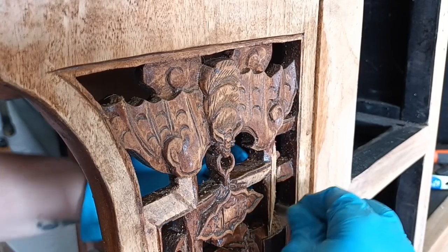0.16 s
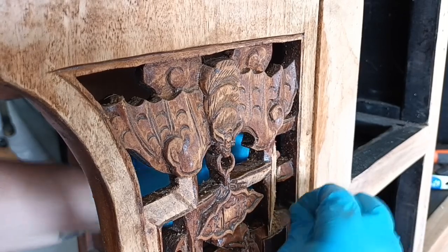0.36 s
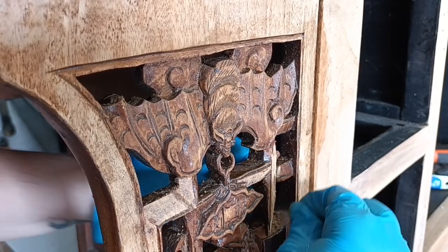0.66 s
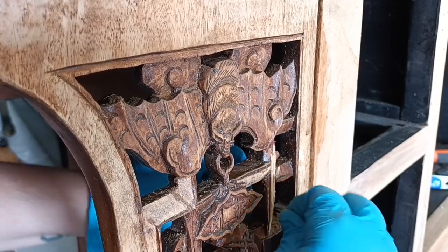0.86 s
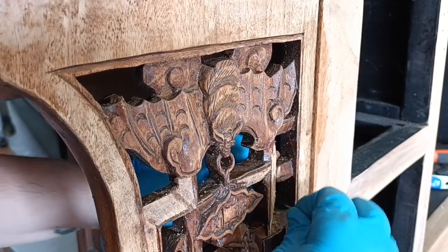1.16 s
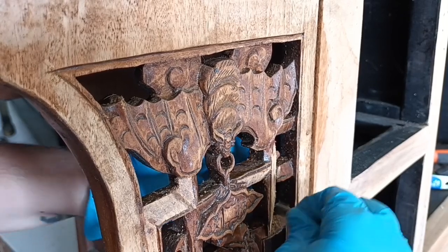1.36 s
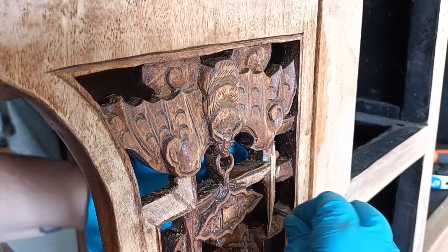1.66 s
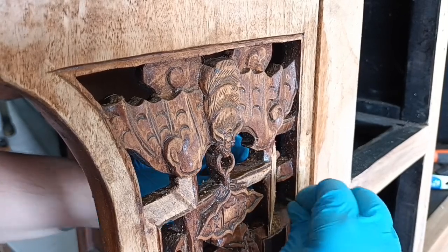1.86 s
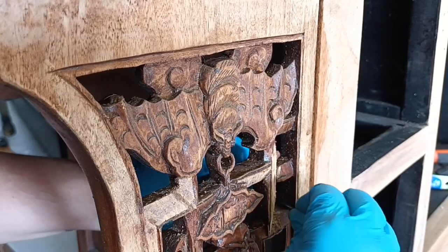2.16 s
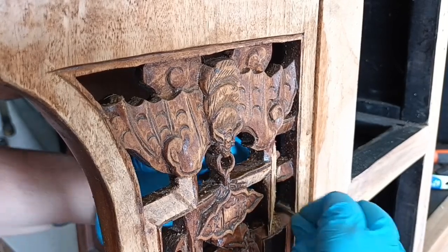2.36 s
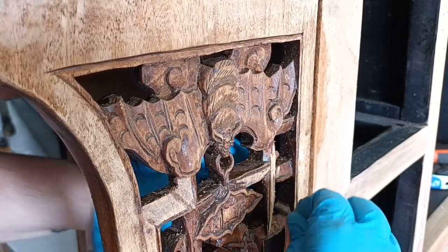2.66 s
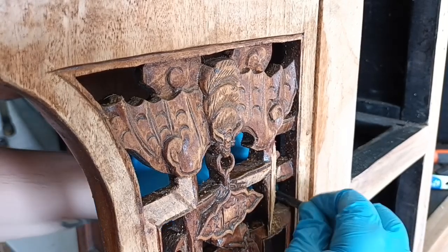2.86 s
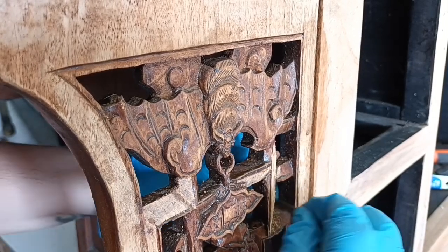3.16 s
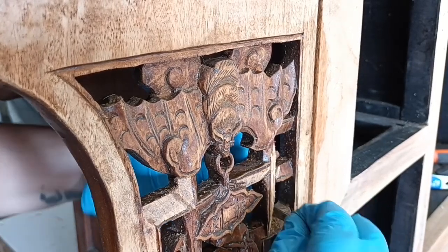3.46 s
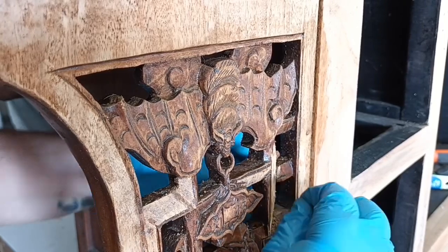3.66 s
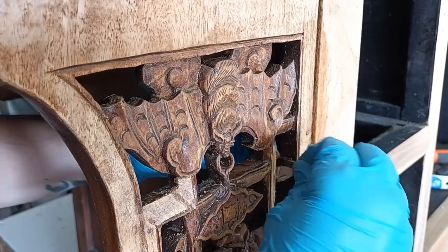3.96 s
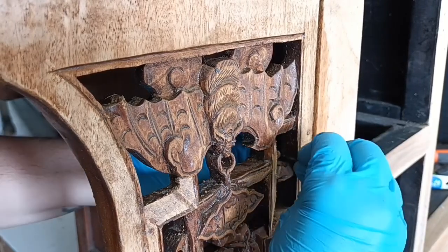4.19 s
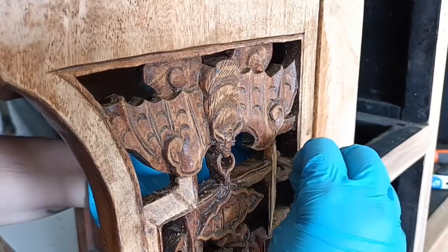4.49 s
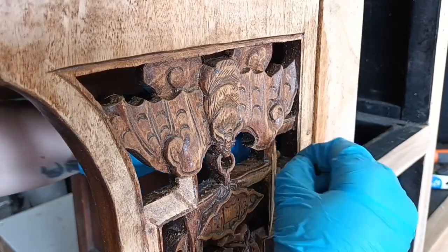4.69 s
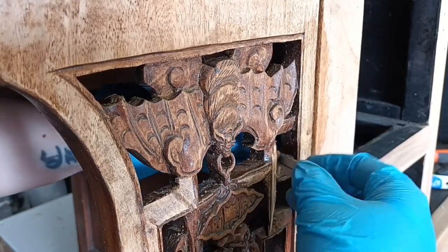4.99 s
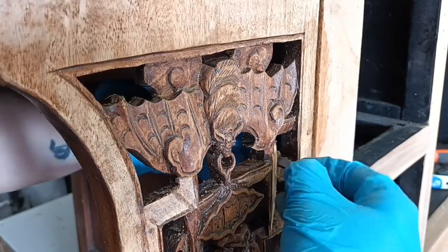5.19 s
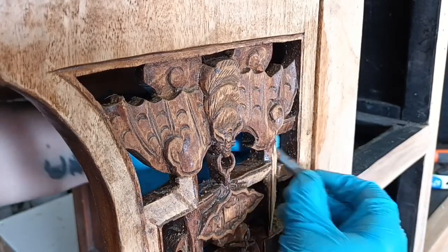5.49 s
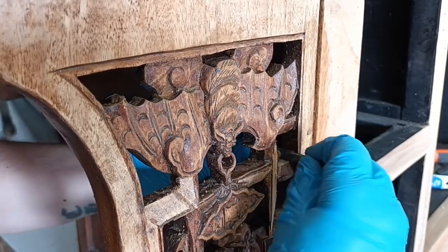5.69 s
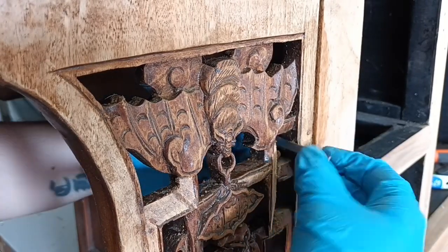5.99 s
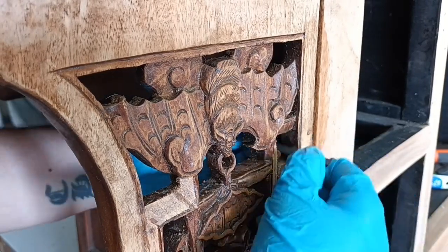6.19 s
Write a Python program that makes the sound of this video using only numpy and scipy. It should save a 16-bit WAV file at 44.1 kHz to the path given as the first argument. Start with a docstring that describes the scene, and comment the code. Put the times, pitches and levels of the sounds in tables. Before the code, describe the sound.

A scraper works old finish from a carved wooden frame, heard close and slightly to the right. First come separate gritty strokes with a hollow resonant body, sharp ticks and a few clacks with short reverberation. Then rapid stubby jabs and muffled bumps follow, almost without echo, with tiny thin chirps. A quieter fiddling passage leads to a last tap and scrapes over low rumble and faint room noise.

```python
"""A hand scraper takes old finish off carved hardwood: at first long draws, with a few jabs and nudges among them.
Their edge noise leads the wood; random fractures ring wood and blade resonances, with snaps and light taps on top.
Early on, filtered noise clacks as knocks, thin gliding tones chirp and a decaying noise tail gives reverberation.
After three seconds the reverberant tail is cut short, then returns faintly; short jabs and dull nudges take over.
Chirps go on now and then, over noise for the frame's rumble and a steady workshop background."""
import sys
import numpy as np
from scipy import signal
from scipy.fft import rfft, irfft
from scipy.io import wavfile
from scipy.ndimage import uniform_filter1d, map_coordinates

SR = 44100
rng = np.random.default_rng(int(sys.argv[2]) if len(sys.argv) > 2 else 0)


def transcribe(u):
    """Save the signal u as a 16-bit wav file named by the first command-line argument.

    u: samples, shape (n,) or (channels, n), limited to [-1, 1]; the rate is SR.
    q: integer samples, one column per channel.
    """
    v = np.clip(np.atleast_2d(u).T, -1, 1)
    q = np.round(v * 32767).astype(np.int16)
    wavfile.write(sys.argv[1], SR, q)


N = 279594
TIME = np.arange(N) / SR  # s
FREQ = np.fft.rfftfreq(N, 1 / SR)  # Hz

# Long draws of the blade: [peak t/s, rise/s, fall/s, force/dB, rasp over force/dB, hiss over force/dB]
DRAWS = [(0.01, 0.036, 0.054, -45, 3, 3.5), (0.268, 0.025, 0.019, -41, 1, -23),
         (0.392, 0.059, 0.071, -36, -5.5, -1), (0.748, 0.023, 0.028, -47.5, 3, 10),
         (0.822, 0.032, 0.057, -30.5, -9.5, -15), (1.158, 0.03, 0.027, -52, 4, 11.5),
         (1.225, 0.078, 0.14, -43.5, -7.5, -12), (1.549, 0.026, 0.037, -53.5, -16, 7.5),
         (1.585, 0.047, 0.065, -41, -9.5, -39), (2.19, 0.042, 0.042, -33.5, -12, -14.5),
         (2.6, 0.069, 0.064, -35.5, -9, -10.5), (2.966, .024, 0.065, -28.5, -1, -9.5)]
DRAW_FRAME_DB = -10.5  # over the force
# Lags of a draw, the edge ahead of the wood: [frame/s, panel/s, rasp/s, hiss/s]
DRAW_LAGS_S = (-0.0058, 0.0061, -0.0076, -0.015)
# Short jabs into the carving: [peak t/s, rise/s, fall/s, force/dB, hiss over force/dB]
JABS = [(0.235, 0.014, .012, -56, 14.5), (1.647, 0.0045, .006, -57, 3.5), (1.9, .014, 0.0074, -61.5, -5),
        (1.99, 0.027, 0.015, -52.5, -19), (2.481, 0.0037, 0.0089, -56, 1.5),
        (2.833, 0.0038, 0.01, -61, 7.5), (3.1, 0.031, .024, -53, -2.5), (3.175, 0.016, .023, -35, -8),
        (3.26, 0.0099, 0.014, -37.5, -7.5), (3.333, 0.0082, .021, -29.5, -11.5),
        (3.424, 0.0085, 0.018, -27.5, -17.5), (3.518, 0.015, .014, -43, -13),
        (3.573, 0.011, 0.025, -34.5, -19.5), (3.661, 0.019, 0.024, -33.5, -8),
        (3.893, 0.0032, 0.0052, -32.5, -18), (3.924, 0.026, 0.013, -36.5, -4.5),
        (4.042, .02, 0.024, -55.5, -8), (4.107, .021, 0.021, -53, -4.5), (4.165, 0.0076, 0.017, -50.5, -7),
        (4.236, 0.0036, .018, -30.5, -27), (4.318, .004, 0.032, -64, 2), (4.38, 0.0016, .014, -28.5, -13.5),
        (4.596, 0.0067, 0.0079, -59.5, -0.5), (4.947, 0.0059, 0.019, -85, 25.5),
        (5.047, .006, 0.0073, -59.5, -5), (5.26, 0.043, 0.033, -66, -2.5), (5.469, 0.0071, 0.017, -62, 17),
        (5.552, 0.018, 0.0093, -58.5, -5.5), (5.749, 0.011, .013, -38, -26),
        (5.916, 0.014, .015, -53.5, -1), (5.975, 0.0044, 0.023, -46.5, -19.5),
        (6.166, .012, .013, -42.5, -5.5), (6.21, 0.02, 0.047, -44, -18), (6.259, 0.0098, 0.011, -38, -16.5),
        (6.33, 0.014, 0.0092, -41, 3)]
JAB_FRAME_DB, JAB_RASP_DB = -14.5, -.5  # over the force
# Lags of a jab: [frame/s, panel/s, rasp/s, hiss/s]
JAB_LAGS_S = (0.0106, 0.0042, -0.0023, -0.00057)
# Dull nudges of hand and tool against the work: [peak t/s, rise/s, panel level/dB, frame level/dB]
NUDGES = [(1.186, 0.019, -38.5, -47), (1.996, 0.015, -65, -45), (3.092, 0.06, -61, -48),
          (3.676, 0.0088, -29, -36), (4.038, 0.022, -63, -51), (4.215, 0.012, -43, -52),
          (4.246, 0.013, -48, -33.5), (4.475, 0.015, -45, -68), (4.518, .015, -46.5, -67),
          (4.626, 0.031, -58.5, -76), (4.818, 0.019, -37, -55.5), (5.126, 0.044, -55.5, -46),
          (5.289, 0.017, -42.5, -39.5), (5.425, 0.022, -43, -68.5), (5.499, 0.018, -67, -44),
          (5.636, 0.016, -37.5, -38.5), (5.75, 0.024, -37.5, -41.5), (5.821, 0.011, -46.5, -50),
          (5.929, 0.029, -57, -48.5), (6.178, 0.014, -62, -39.5), (6.259, 0.016, -58, -34.5)]
NUDGE_FALL = 0.57  # fall as a share of the rise
NUDGE_RASP_DB, NUDGE_HISS_DB = -11, -35  # over the panel
# Rustle of the resting hands: [frame level/dB, panel level/dB, rasp level/dB, hiss level/dB]
CONTACT_DB = (-74, -76, -75, -83)
CONTACT_SWAY_DB, CONTACT_HZ = 0.5, 18  # how far and how fast the rustle comes and goes
# How lightly the edge skims; a light touch is brighter: [t/s, tilt/dB]
SKIM = [(0, -5), (1.2, -8), (3.0, -5), (4.4, 0.5), (4.9, 14.5), (5.5, 1.5), (6.1, -6.5)]
# Registers a push drives (frame, panel, rasp, hiss, fizz, spray):
# [low edge f/Hz, high edge f/Hz, left-right likeness/share, clumping/dB]
REGISTERS = [(90.1, 264, 1, 2.5), (260, 400, 0.88, 1.5), (578, 2460, 0.56, 2), (2020, 4230, 0.033, 2),
             (4800, 12300, 0.012, 5), (11800, 4900, .02, 13)]
# Resonances of the wood (low) and blade (high): [f/Hz, width/Hz, level over the colour/dB]
RESONANCES = [(162.2, 16.5, 17.5), (228, 21, 8), (351, 23, 10.5), (387, 23, 17.5), (432.5, 9.1, 25.5),
              (481, 34, 14), (643, 85, 8), (771.5, 51, 12.5), (815, 180, 6), (1036, 6.3, 10), (1070, 19, 0),
              (1197, 46, 4), (2210, 22, 10.5), (2710, 27, 14), (2910, 92, 15), (3864, 128, 14),
              (4370, 140, -10), (5170, 310, 4), (6070, 310, 8.5), (6663, 140, 10.5), (10660, 920, 8.5),
              (11400, 480, 2.5), (15200, 1500, 13)]
# Broad colour of the scraping under the resonances: [f/Hz, level/dB]
COLOUR = [(60, -3), (150, 2.5), (270, -5), (430, 2), (560, 4), (800, 1), (1150, 2.5), (1600, -3.5),
          (2400, -10), (3300, -14), (5000, -11.5), (7000, -9), (8300, -17), (11000, -14), (13000, -18),
          (16000, -24.5)]
# The edge catches and a large flake snaps off: [t/s, level/dB]
CATCHES = [(0.3429, -19), (0.3669, -21.5), (0.399, -25.5), (0.416, -28.5), (0.734, -34.5), (0.7756, -62),
           (0.8016, -23.5), (0.825, -41), (0.8366, -31), (1.191, -37), (1.2078, -37), (1.2386, -38),
           (1.2518, -39.5), (1.27, -33.5), (1.562, -38), (1.64, -42), (1.9582, -43), (2.5766, -26),
           (2.916, -33.5), (2.99, -30.5), (3.0028, -22), (3.8881, -27.5), (3.908, -37), (4.1156, -47.5),
           (4.191, -47), (4.231, -43.5), (4.246, -37.5), (4.3745, -34.5)]
CATCH_DECAY_S = .0047
# Light taps of the tool on the wood: [t/s, level/dB]
TAPS = [(1.7963, -33.5), (1.961, -41.5), (2.3485, -36), (5.465, -41), (6.3005, -28.5)]
# Modes that ring in a tap: [f/Hz, level/dB, t60/s]
TAP_MODES = [(797, 7, 0.041), (883, -5.5, 0.023), (1400, -7, 0.051), (1830, -13, 0.02),
             (2890, -10.5, 0.021), (3760, -3, 0.019)]
BOUNCE_S, BOUNCE_DB = .0127, -8.5  # the tool lands a second time
# Soft rubs that sink in pitch: [peak t/s, rise and fall/s, level/dB]
RUBS = [(0.587, .03, -42.5), (1.384, .027, -34.5)]
# Balance of the two near channels: [f/Hz, left minus right/dB]
PORTS = [(100, 1.5), (200, -1.5), (400, -3.5), (700, -6), (1250, 0), (2400, 0), (4400, -5), (6500, -5),
         (9500, 0), (14000, -8.5)]
# Knocks across the workshop, before the scene's mix gains: [t/s, level/dB, centre f/Hz, width/octaves, decay/s]
KNOCKS = [(0.152, -49, 1220, 0.19, 0.016), (0.2453, -16, 1370, 0.94, 0.0053),
          (1.0387, -29.5, 1204, 0.54, .011), (1.795, -45.5, 1250, 0.95, 0.0075),
          (1.9595, -31, 1495, 0.53, 0.0058), (1.974, -34.5, 619, 0.24, 0.012),
          (2.3454, -36.5, 1260, 0.43, 0.0042), (2.415, -41, 1530, .52, 0.009),
          (2.757, -28, 1890, 0.52, 0.0062), (2.831, -45.5, 1840, 0.48, 0.011)]
REBOUND_S, REBOUND_DB = 0.013, -13.5  # each knock touches twice
# Thin chirps, before the scene's mix gains: [t/s, length/s, first f/Hz, last f/Hz, level/dB]
CHIRPS = [(1.022, 0.045, 4170, 4600, -63), (1.035, .09, 2650, 3930, -60), (3.708, 0.04, 3160, 3700, -66.5),
          (3.78, 0.03, 3030, 3430, -66.5), (3.901, 0.05, 4740, 4660, -59), (3.983, 0.032, 2810, 3320, -61),
          (4.257, 0.02, 3370, 3640, -67.5), (4.484, 0.023, 2240, 2100, -65.5),
          (4.509, 0.04, 3210, 3220, -70), (4.634, 0.0336, 3900, 3400, -67.5),
          (4.874, 0.028, 2956, 3090, -62), (4.979, 0.024, 3500, 3290, -68), (5.869, 0.043, 3140, 3030, -73),
          (6.009, 0.044, 3290, 3180, -74.5)]
# Colour of the chirps and their overtones: [f/Hz, level/dB]
CHIRP_COLOUR = [(2800, -7), (4500, 1), (7000, -2), (9000, -9.5), (11000, -15.5), (14000, -22)]
SECOND_HZ, SECOND_DB, SECOND_LEAD_S = 4440, -10, 0.0037  # each chirp's second voice, which does not glide
# Decay of the reverberant tail: [f/Hz, t60/s]
TAIL_T60 = [(150, 1), (400, 0.71), (1000, 0.5), (2500, 0.38), (6000, 0.31), (11000, 0.3), (16000, 0.05)]
# Level of the reverberant tail: [t/s, level/dB]
TAIL_LEVEL = [(0, -13), (3.08, -18.5), (3.13, -42), (6.34, -28)]
# The heavy frame rocks under the hands, before the rumble's gain: [peak t/s, rise and fall/s, level/dB]
ROCKS = [(0.78, 0.19, -56), (3.682, 0.027, -59.5), (4.253, 0.019, -56), (5.064, 0.069, -58),
         (5.994, 0.082, -46), (6.307, 0.093, -39)]
RUMBLE_REST_DB = -77.5  # tremble in between, before the rumble's gain
# Relative colour of the rumble: [f/Hz, level/dB]
RUMBLE_COLOUR = [(20, -29), (42, -21), (52, -5), (60, 1), (70, -8), (90, -8), (130, -18), (250, -55),
                 (1000, -90)]
# Relative colour of the workshop background: [f/Hz, level per Hz/dB]
AIR = [(24, -36), (40, -16), (167, -2), (297, -13.5), (422, -17.5), (556, -14), (2500, -27), (2840, -31),
       (4240, -29.5), (6650, -35.5), (8130, -44.5), (10700, -33.5), (16000, -45)]
AIR_DB = -70
CUTOFF_HZ = 16200


def scraping(powers, steady_s=0.035, trims_db=(0, -.3, 1.2, .4, .5, .8)):
    """Each push feeds a stream of fractures into the frame, the panel and the blade."""
    grit = flakes(per_s=7000, spread_db=2.5)
    grip = 0.5 * wander(150) + 0.84 * wander(42)  # the edge sticks and slips
    out = np.zeros((2, N))
    for power, (low, high, likeness, clump_db), trim_db in zip(powers, REGISTERS, trims_db):
        fractures = grit * amp(clump_db * grip) * pair(likeness)
        ring = convolve(fractures, register(low, high))
        # the noise is evened to a steady level, then shaped by each push's envelope
        local_power = uniform_filter1d((ring ** 2).mean(0), int(steady_s * SR))
        local_level = np.sqrt(abs(local_power) + 1e-9)
        out += amp(trim_db) * np.sqrt(power) * ring / local_level
    return out


def pushes(spray_db=-7):
    """Power of all pushes in each register: it swells as the edge bites and fades as it slides out."""
    rustle_sway = amp(CONTACT_SWAY_DB * wander(CONTACT_HZ))
    power = np.outer(amp(CONTACT_DB), rustle_sway) ** 2
    for s, rise, fall, levels_db, lags in gestures():
        for band, db, lag in zip(power, levels_db, lags):
            start, push = swell(s + lag, rise, fall)
            add(band, start, (amp(db) * push) ** 2)
    *wood, edge = power
    # a lighter touch tilts the edge's power from hiss towards fizz and spray
    skim_db = curve(SKIM)
    share = amp([np.zeros(N), skim_db, 2 * skim_db + spray_db]) ** 2
    return *wood, *(edge * share / share.sum(0))


def gestures():
    """Every hand move as (s, rise, fall, levels dB, lags s), the last two for frame, panel, rasp and hiss."""
    for s, rise, fall, db, rasp_db, hiss_db in DRAWS:
        yield s, rise, fall, db + np.array([DRAW_FRAME_DB, 0, rasp_db, hiss_db]), DRAW_LAGS_S
    for s, rise, fall, db, hiss_db in JABS:
        yield s, rise, fall, db + np.array([JAB_FRAME_DB, 0, JAB_RASP_DB, hiss_db]), JAB_LAGS_S
    for s, rise, db, frame_db in NUDGES:
        levels_db = (frame_db, db, db + NUDGE_RASP_DB, db + NUDGE_HISS_DB)
        yield s, rise, NUDGE_FALL * rise, levels_db, np.zeros(4)


def swell(s, rise, fall, rise_shape=2.22, fall_shape=1.53):
    """Start time and envelope of a push that peaks at s."""
    t = np.arange(max(s - 4 * rise, 0), s + 5 * fall, 1 / SR) - s
    decline = np.where(t < 0, abs(t / rise) ** rise_shape, abs(t / fall) ** fall_shape)
    return s + t[0], np.exp(-decline)


def flakes(per_s, spread_db):
    """Tiny fractures at random moments, of very uneven size."""
    size = amp(spread_db * np.minimum(rng.exponential(1, N), 4))
    return size * (rng.random(N) < per_s / SR)


def pair(likeness):
    """Random signs and sizes for left and right, alike by the given share: the panel radiates unevenly."""
    likeness = np.clip(likeness, 0, 1)
    shared, left, right = rng.standard_normal((3, N))
    return np.sqrt(likeness) * shared + np.sqrt(1 - likeness) * np.array([left, right])


def wood_and_blade(hz):
    """Gain from the cutting edge to the air: resonances standing on a broad colour."""
    peaks = sum(amp(db) ** 2 / (1 + (2 * (hz - f) / width) ** 2) for f, width, db in RESONANCES)
    return amp(read(COLOUR, hz)) * np.sqrt(1 + peaks)


def register(low_hz, high_hz, order=8):
    """Response of wood and blade through a low and a high slope, with an energy of one."""
    def gain(hz):
        low_slope = 1 + (low_hz / (hz + 1)) ** order
        high_slope = 1 + (hz / high_hz) ** order
        return wood_and_blade(hz) / np.sqrt(low_slope * high_slope)
    response = causal(gain)
    return response / np.linalg.norm(response)


def moving_spot(x, depth_db=4.0, dwell_s=.07, spacing=1.5, size=1024):
    """As the edge travels over the carving it favours now these modes, now those."""
    hz, t, z = signal.stft(x, SR, nperseg=size, noverlap=size * 3 // 4)
    place = np.meshgrid(np.sqrt(hz) / spacing, t / dwell_s, indexing="ij")  # higher modes lie wider apart
    favour = map_coordinates(rng.standard_normal((256, 256)), place, order=3, mode="wrap")
    favour *= np.clip(hz / 600, 0, 1)[:, None]  # the long waves of the frame hardly depend on the spot
    coloured = z * unit(amp(depth_db * favour))
    return signal.istft(coloured, SR, nperseg=size, noverlap=size * 3 // 4)[1][:, :N]


def catches(fizz, low_hz=2000, gain_db=0.0, swell_s=0.0003, small_per_s=25, small_db=6.5):
    """The edge lets go in a sudden, bright burst of fractures; small ones come by chance, scaled by the fizz."""
    t = np.arange(-SR // 100, SR // 20) / SR
    snap = np.exp(np.where(t < 0, t / swell_s, -t / CATCH_DECAY_S))
    small = amp(small_db) * np.sqrt(fizz) * (rng.random(N) < small_per_s / SR)
    bursts = convolve(small, snap[t >= 0])[0]
    for s, db in CATCHES:
        add(bursts, s + t[0], amp(db) * snap)
    grit = unit(flakes(per_s=22000, spread_db=1.5) * pair(0.017))
    return amp(gain_db) * convolve(bursts * grit, register(low_hz, CUTOFF_HZ, order=4))


def taps(contact_s=.0018):
    """A soft contact rings the tool's few modes, then a weaker bounce rings them again."""
    out, t = np.zeros(N), np.arange(SR // 6) / SR
    ring = sum(amp(db - 60 * t / t60) * np.sin(2 * np.pi * hz * t) for hz, db, t60 in TAP_MODES)
    onset = 1 - np.exp(-t / contact_s)
    for s, db in TAPS:
        for delay, drop_db in (0, 0), (BOUNCE_S, BOUNCE_DB):
            add(out, s + delay, amp(db + drop_db) * ring * onset)
    return out


def rubs(centre_hz=1120, sink_octaves_per_s=16.0, width_hz=1250, grit_db=-15):
    """The blade's flat slides over the wood: friction in a broad, sinking resonance, with a little grit."""
    out, blade = np.zeros((2, N)), register(1650, 6800)
    r = np.exp(-np.pi * width_hz / SR)  # pole radius
    for s, length, db in RUBS:
        start, push = swell(s, length, length)
        count = len(push)
        hz = centre_hz * 2 ** (-sink_octaves_per_s * (start - s + np.arange(count) / SR))
        carrier = np.exp(2j * np.pi * np.cumsum(hz) / SR)
        for port in out:
            a, b, grit = rng.standard_normal((3, count))
            friction = signal.lfilter([1], np.poly([r, r, r, r]), a + 1j * b) * carrier
            blade_grit = unit(signal.fftconvolve(grit, blade)[:count])
            add(port, start, amp(db) * push * (unit(friction.real) + amp(grit_db) * blade_grit))
    return out


def near(x, lag_ms=.12):
    """The work lies to the right, so the left port hears it a little later and mostly softer."""
    side_db = read(PORTS, FREQ) / 2
    left = amp(side_db) * np.exp(-2j * np.pi * FREQ * lag_ms / 1000)
    both = np.array([left, amp(-side_db)])
    even_power = np.sqrt((amp(2 * side_db) + amp(-2 * side_db)) / 2)
    return irfft(both * rfft(x) / even_power, N)


def knocks():
    """Short hollow clacks: noise bursts around their own pitch, each with a rebound."""
    out, t = np.zeros((2, N)), np.arange(SR // 10) / SR
    for s, db, centre_hz, octaves, decay in KNOCKS:
        colour = causal(lambda hz: np.exp(-.5 * (np.log2((hz + 1) / centre_hz) / octaves) ** 2))
        rebound = np.exp(-abs(t - REBOUND_S) / decay) * (t > REBOUND_S)
        contacts = np.exp(-t / decay) + amp(REBOUND_DB) * rebound
        for port in out:
            clack = signal.fftconvolve(rng.standard_normal(len(t)) * contacts, colour)
            add(port, s, amp(db) * clack * np.sqrt(decay * SR / 2) / np.linalg.norm(clack))
    return out


def chirps(waver=0.028):
    """Quick gliding whistles and a second voice that holds its pitch, all wavering, with two overtones each."""
    out, unrest = np.zeros(N), wander(260)
    for s, length, first_hz, last_hz, db in CHIRPS:
        count = int(length * SR)
        main_voice = s, np.linspace(first_hz, last_hz, count), db
        second_voice = s - SECOND_LEAD_S, SECOND_HZ, db + SECOND_DB
        for start, glide, level_db in main_voice, second_voice:
            hz = glide * (1 + waver * unrest[int(start * SR):][:count])
            phase = 2 * np.pi * np.cumsum(hz) / SR
            tone = sum(amp(read(CHIRP_COLOUR, k * hz)) * np.sin(k * phase) for k in range(1, 4))
            add(out, start, amp(level_db) * unit(tone * signal.windows.tukey(count, .8)))
    return out


def diffuse(t60_table, start_s):
    """Dense reflections, different for each ear, every band dying at its own speed."""
    hz, t, z = signal.stft(rng.standard_normal((2, SR * 3 // 4)), SR, nperseg=256)
    decay = amp(-60 * t / read(t60_table, hz)[:, None])
    tail = signal.istft(z * decay, SR, nperseg=256)[1]
    # silent until start_s, full at twice that
    tail = tail * np.clip(np.arange(tail.shape[1]) / SR / start_s - 1, 0, 1)
    return tail / np.linalg.norm(tail[0])


def rumble(frame, follow_db=-23, gain_db=-7):
    """The frame's deep sway: noise that follows its pushes a little and swells when the hands rock it."""
    sway = amp(RUMBLE_REST_DB) + amp(follow_db) * np.sqrt(frame)
    for s, length, db in ROCKS:
        start, rock = swell(s, length, length)
        add(sway, start, amp(db) * rock)
    return amp(gain_db) * sway * noise(RUMBLE_COLOUR)


def background():
    """Steady workshop air: coloured noise, partly shared between left and right."""
    return amp(AIR_DB) * unit(noise(AIR) + 0.53 * np.array([noise(AIR), noise(AIR)]))


def noise(colour):
    """Steady noise of a given spectrum, with an rms of one."""
    return unit(irfft(rfft(rng.standard_normal(N)) * amp(read(colour, FREQ)), N))


def wander(hz):
    """Smooth chance that changes about hz times a second, with an rms of one."""
    return unit(irfft(rfft(rng.standard_normal(N)) / (1 + (FREQ / hz) ** 4), N))


def causal(gain, size=8192):
    """The quickest-starting (minimum-phase) impulse response that has the given gain(Hz)."""
    log_gain = np.log(np.maximum(gain(abs(np.fft.fftfreq(size, 1 / SR))), 1e-5))
    return np.fft.ifft(np.exp(np.conj(signal.hilbert(log_gain)))).real[:size // 2]


def convolve(x, response):
    """Passes a sound through a response, channel by channel."""
    return signal.oaconvolve(np.atleast_2d(x), np.atleast_2d(response), axes=1)[:, :N]


def add(mix, s, sound):
    """Mixes a sound in at time s."""
    part = mix[max(round(s * SR), 0):][:len(sound)]
    part += sound[:len(part)]


def read(points, hz):
    """Reads a table of (Hz, value) on a log-frequency axis."""
    f, value = np.transpose(points)
    return np.interp(np.log(hz + 1), np.log(f + 1), value)


def curve(points):
    """Reads a table of (s, value) at every sample."""
    return np.interp(TIME, *np.transpose(points))


def amp(db):
    """Decibels to gain."""
    return 10 ** (np.asarray(db) / 20)


def unit(x):
    """Scales to an rms of one."""
    return x / np.sqrt(np.mean(x ** 2) + 1e-20)


def scene():
    """Blade and wood near by, knocks and chirps farther off, over rumble and workshop air."""
    powers = pushes()
    frame, fizz = powers[0], powers[4]
    work = near(moving_spot(scraping(powers)) + catches(fizz) + taps() + rubs())
    clacks = knocks()
    # nearby boards and walls give each knock a short, full body
    body = convolve(clacks, diffuse([(700, 0.54), (3000, 0.39)], start_s=0.004))
    clacks = amp(-2.5) * clacks + amp(-14) * body
    whistles = chirps()
    reflected = convolve(whistles, diffuse([(4000, 0.078)], start_s=0.0028))
    whistles = amp(-4.5) * whistles + amp(3.0) * reflected  # heard mostly by reflection
    send = amp(-1.0) * work + amp(1.0) * clacks
    tail = convolve(send, diffuse(TAIL_T60, start_s=0.00073)) * amp(curve(TAIL_LEVEL))
    return work + clacks + whistles + tail + rumble(frame) + background()


def record(dry):
    """Cuts off the top of the treble with a steep low-pass."""
    low_pass = signal.firwin(401, CUTOFF_HZ, window=("kaiser", 9), fs=SR)
    return signal.oaconvolve(dry, low_pass[None], "same")


dry = scene()
out = record(dry)
transcribe(out)
```